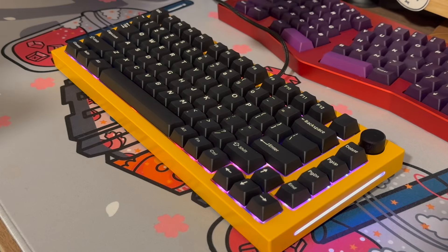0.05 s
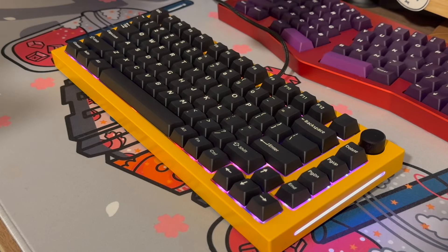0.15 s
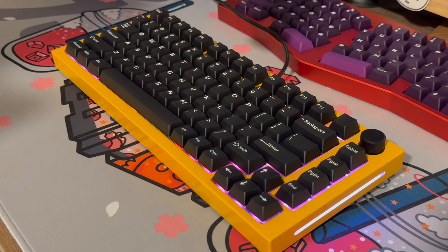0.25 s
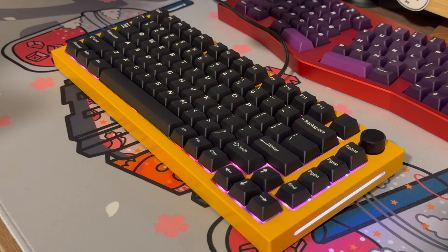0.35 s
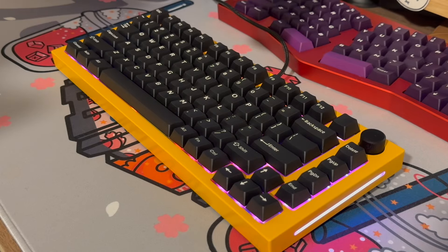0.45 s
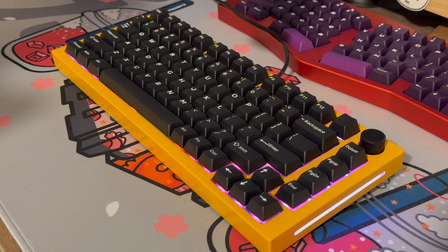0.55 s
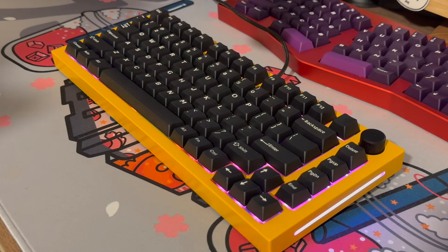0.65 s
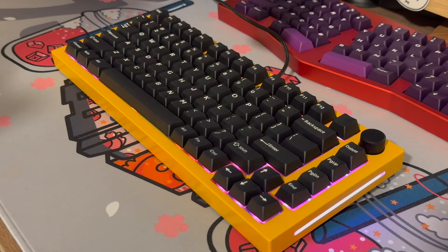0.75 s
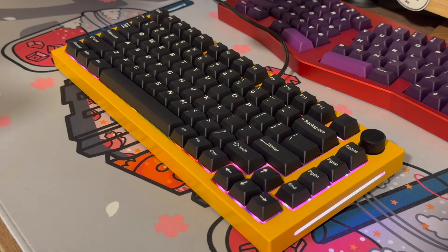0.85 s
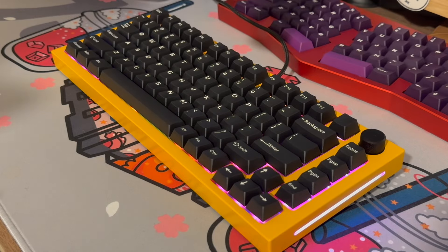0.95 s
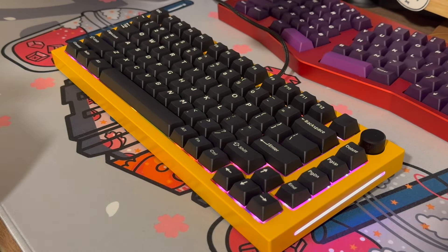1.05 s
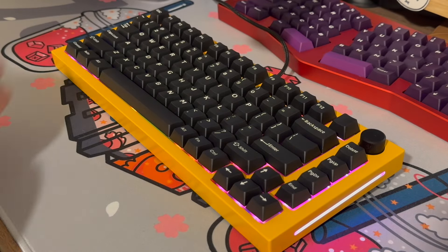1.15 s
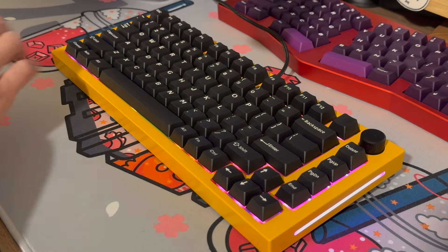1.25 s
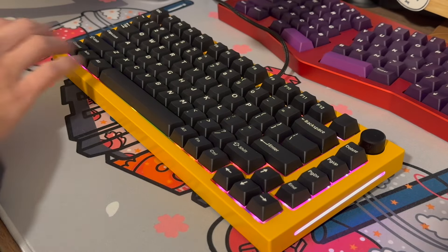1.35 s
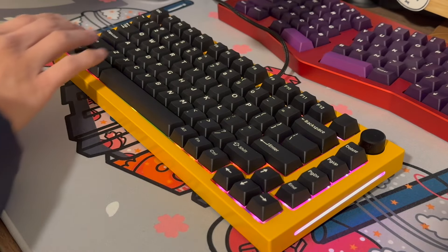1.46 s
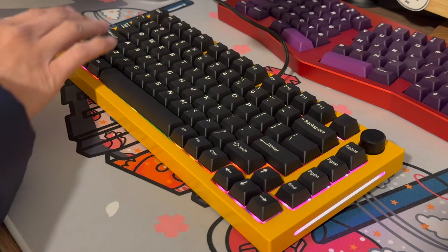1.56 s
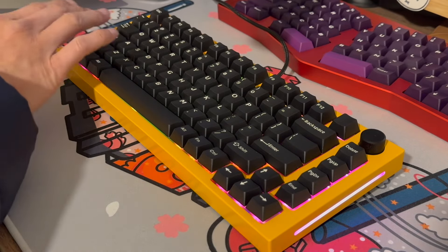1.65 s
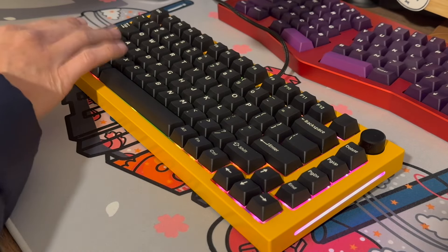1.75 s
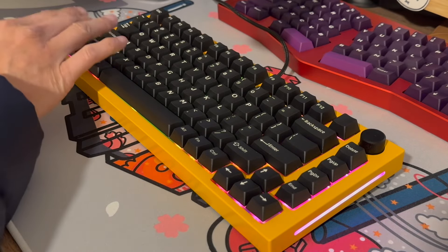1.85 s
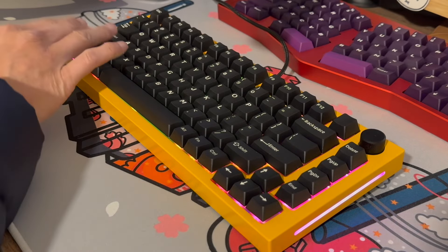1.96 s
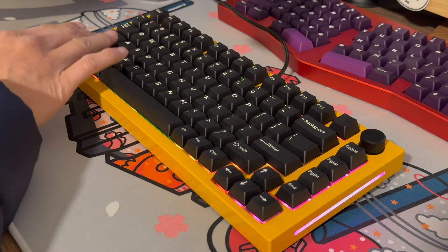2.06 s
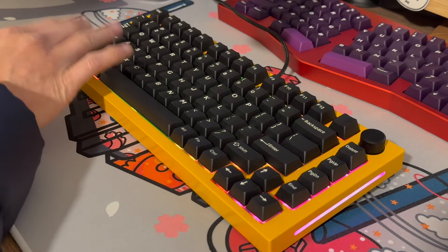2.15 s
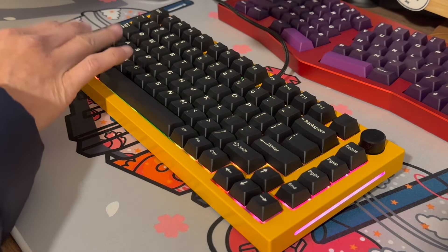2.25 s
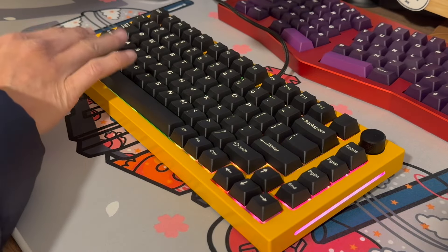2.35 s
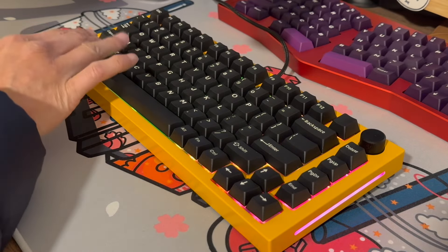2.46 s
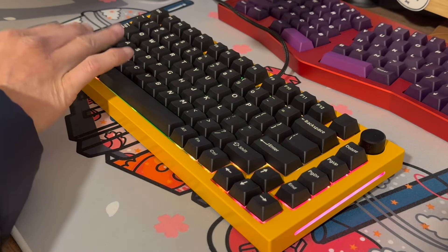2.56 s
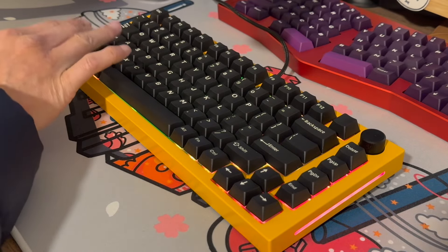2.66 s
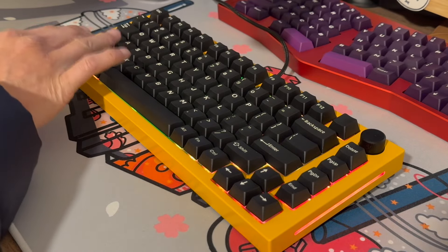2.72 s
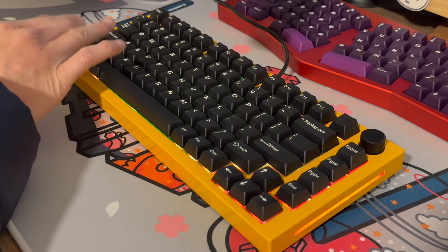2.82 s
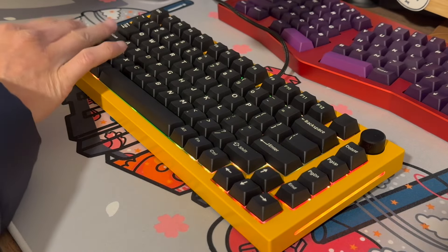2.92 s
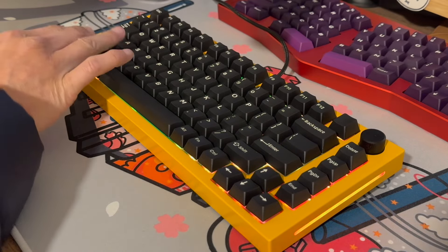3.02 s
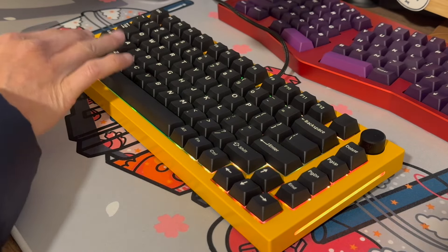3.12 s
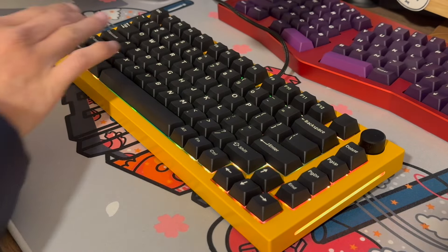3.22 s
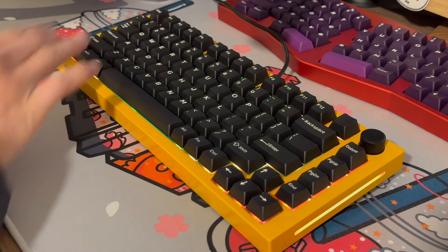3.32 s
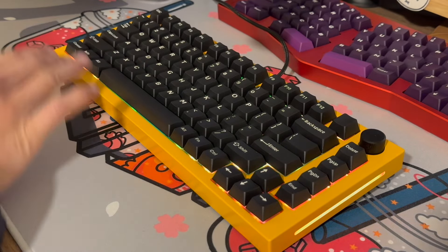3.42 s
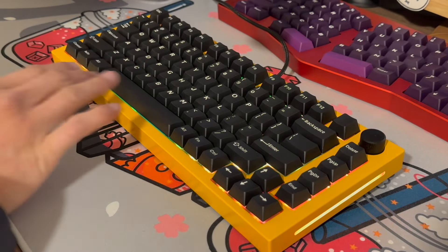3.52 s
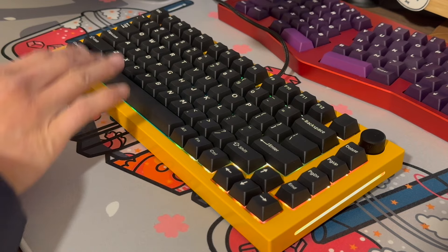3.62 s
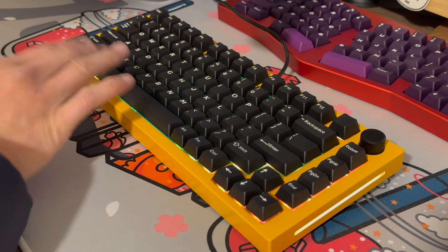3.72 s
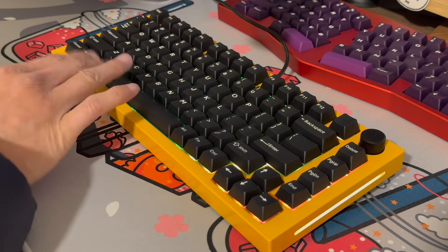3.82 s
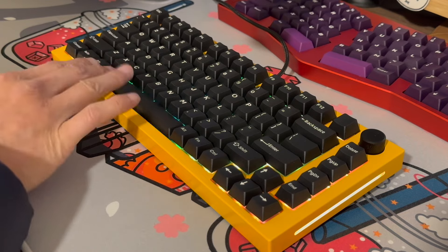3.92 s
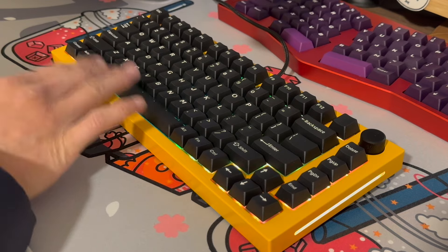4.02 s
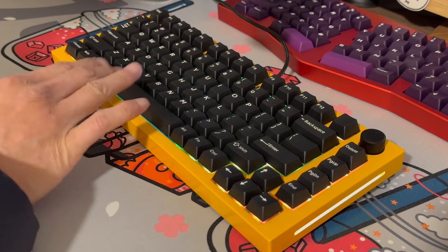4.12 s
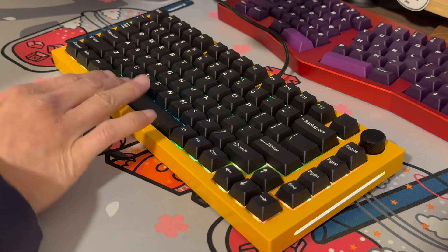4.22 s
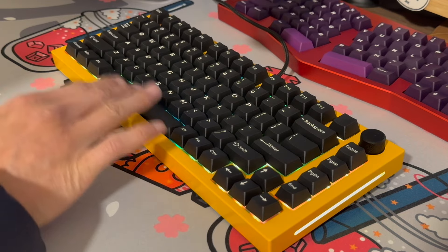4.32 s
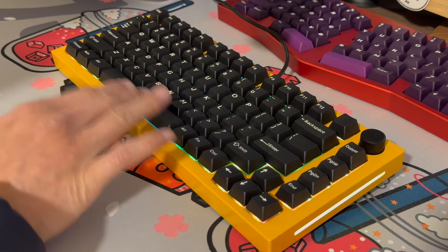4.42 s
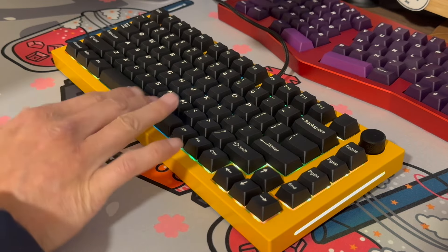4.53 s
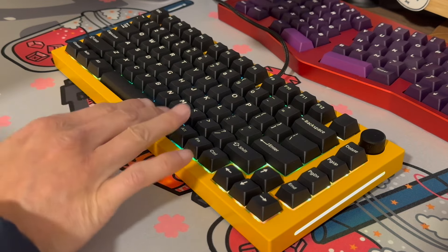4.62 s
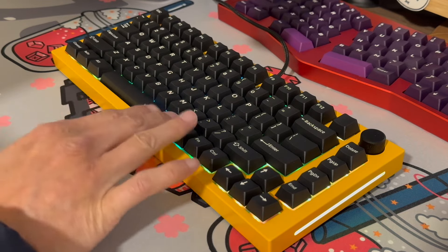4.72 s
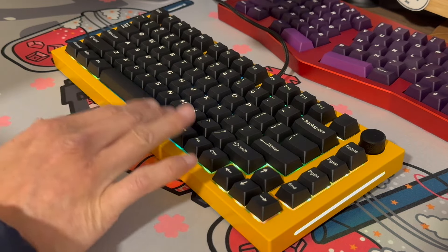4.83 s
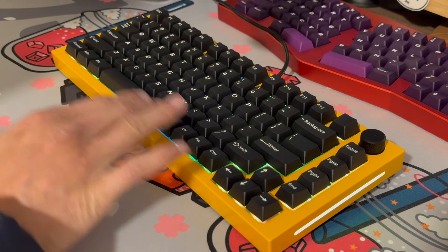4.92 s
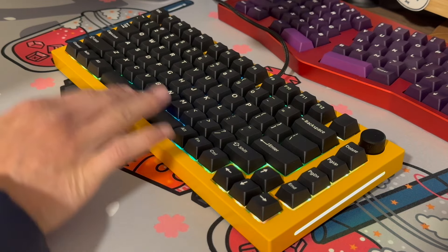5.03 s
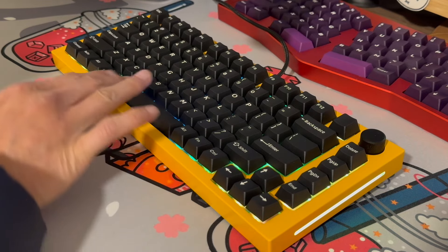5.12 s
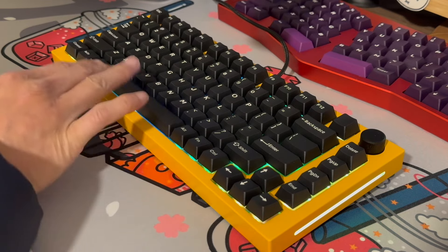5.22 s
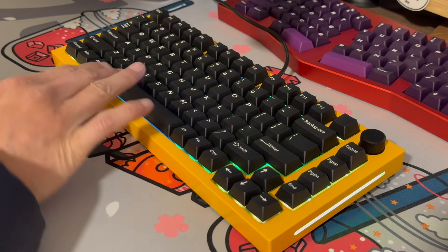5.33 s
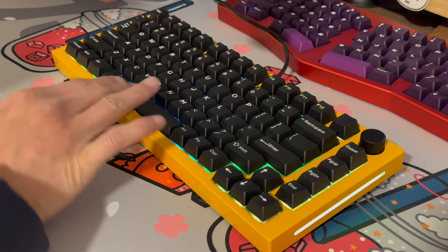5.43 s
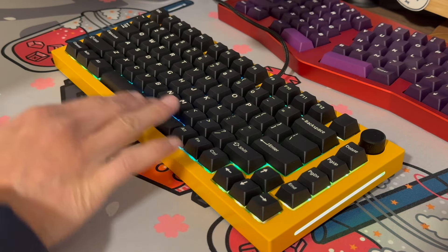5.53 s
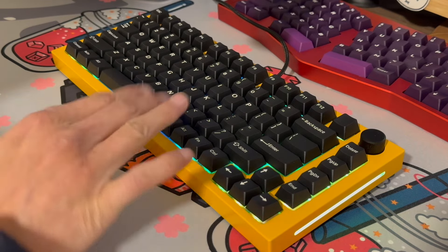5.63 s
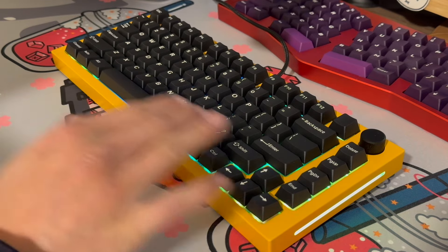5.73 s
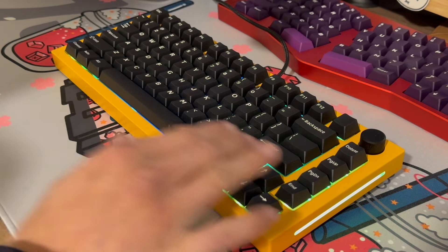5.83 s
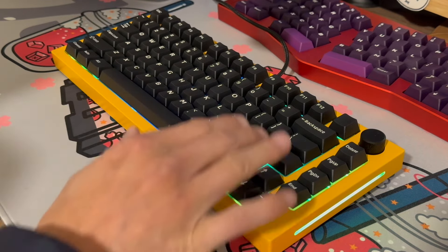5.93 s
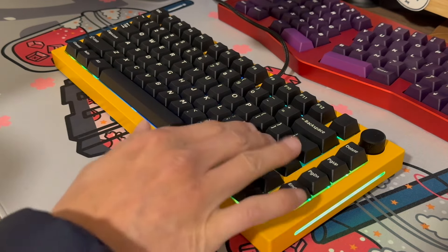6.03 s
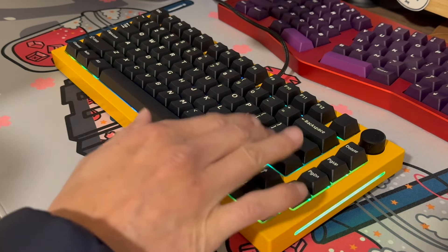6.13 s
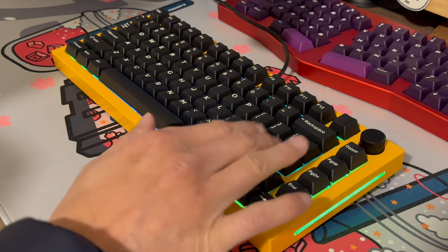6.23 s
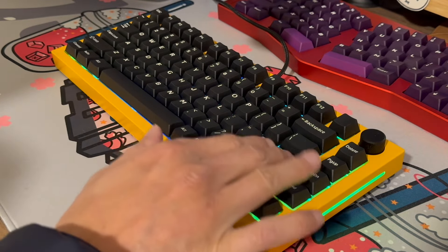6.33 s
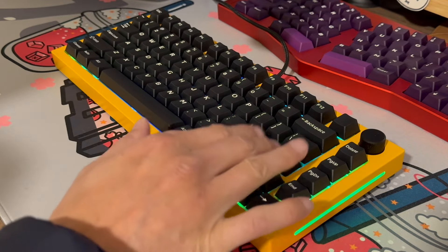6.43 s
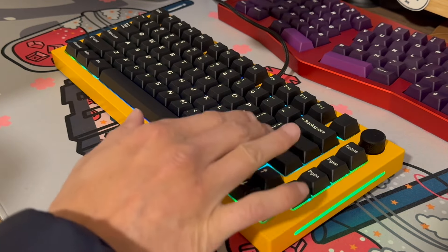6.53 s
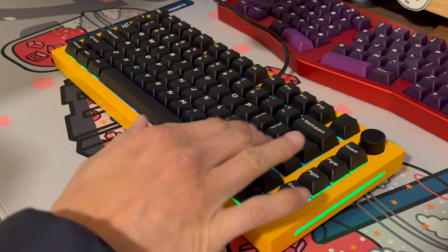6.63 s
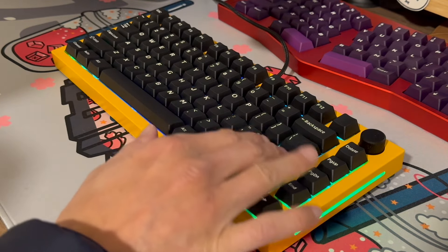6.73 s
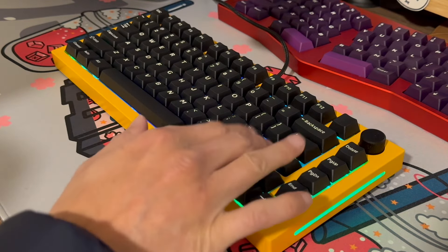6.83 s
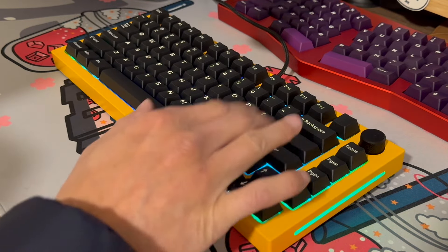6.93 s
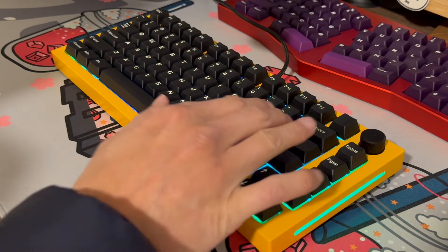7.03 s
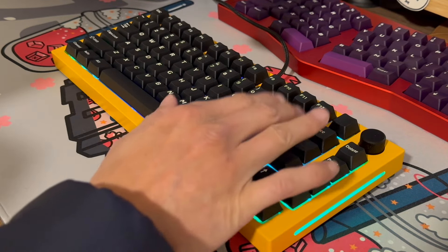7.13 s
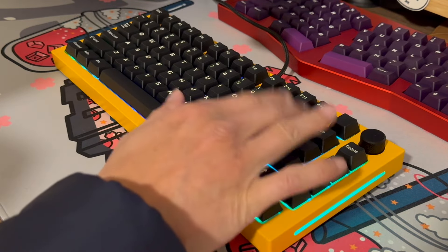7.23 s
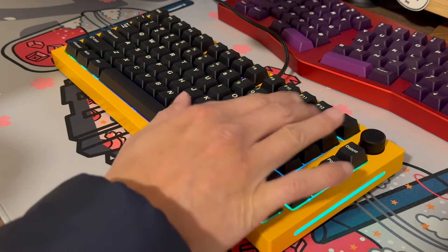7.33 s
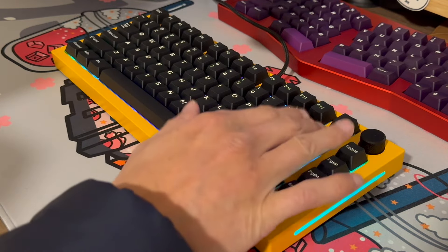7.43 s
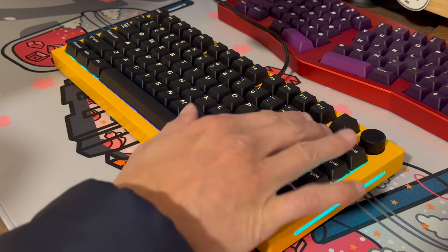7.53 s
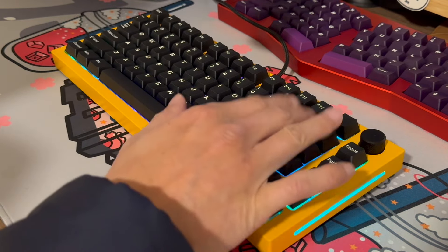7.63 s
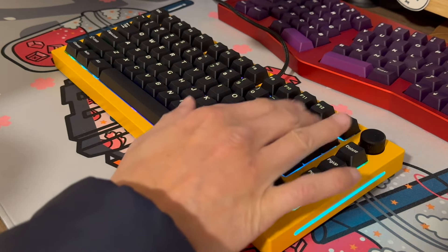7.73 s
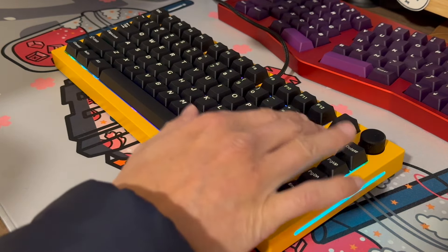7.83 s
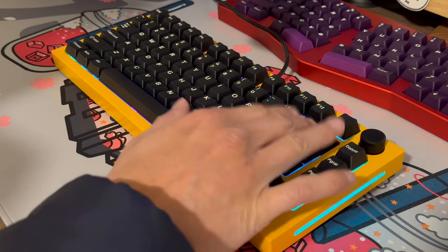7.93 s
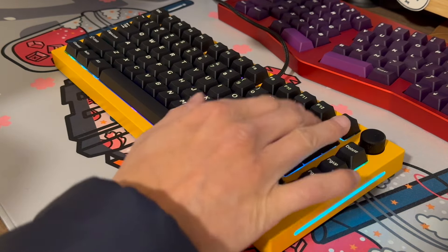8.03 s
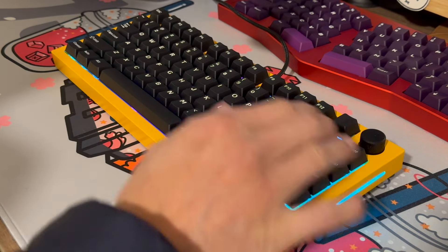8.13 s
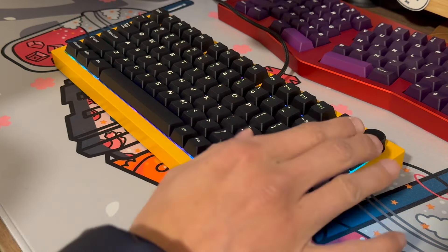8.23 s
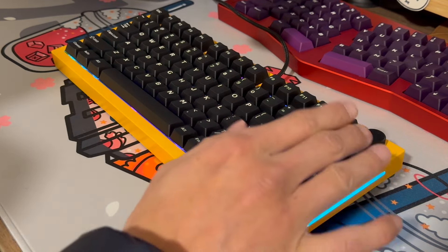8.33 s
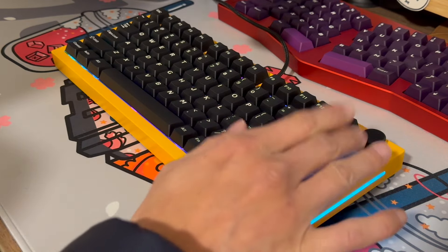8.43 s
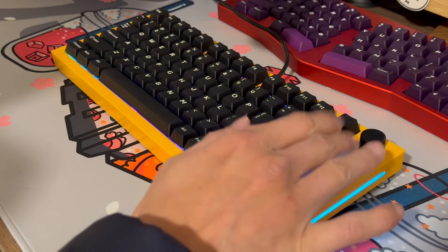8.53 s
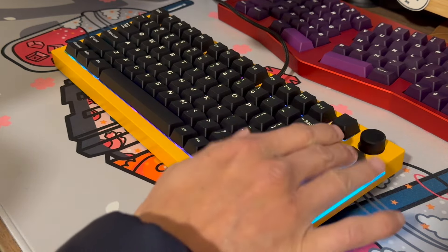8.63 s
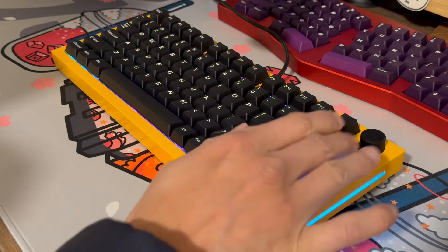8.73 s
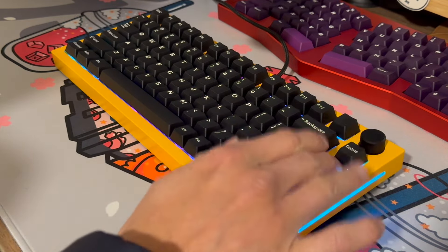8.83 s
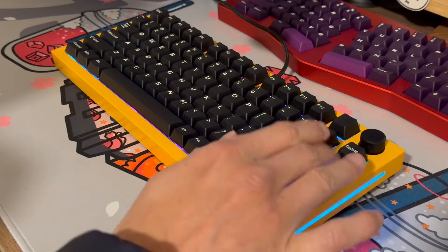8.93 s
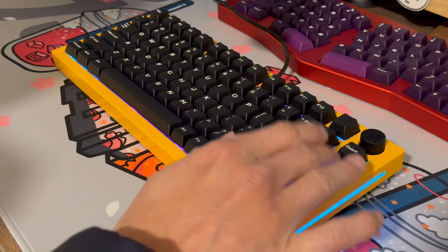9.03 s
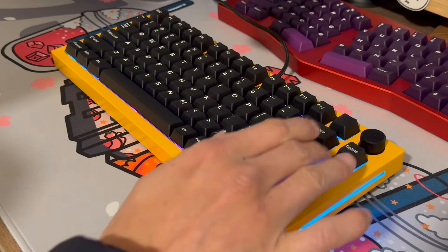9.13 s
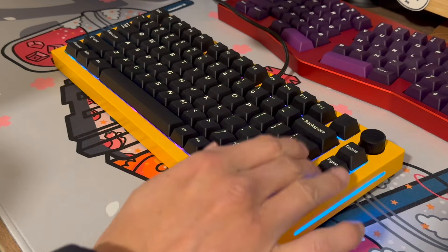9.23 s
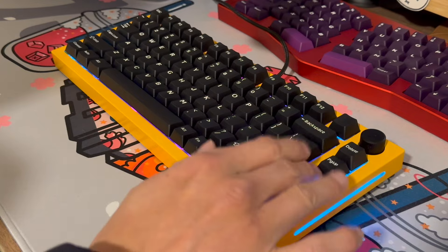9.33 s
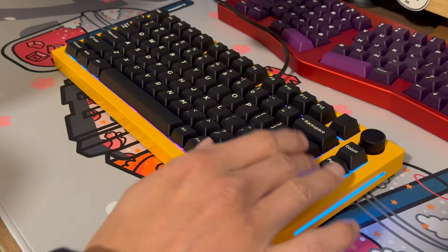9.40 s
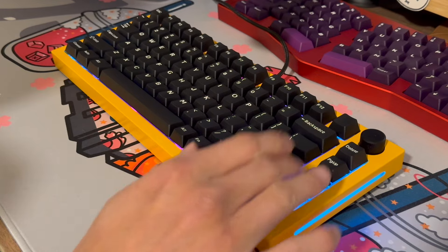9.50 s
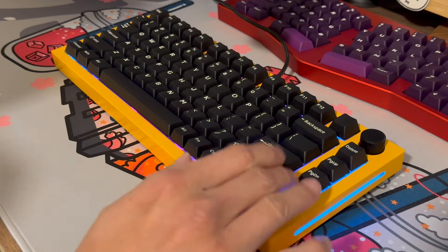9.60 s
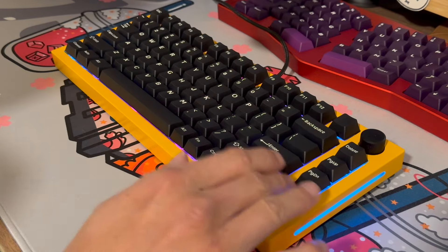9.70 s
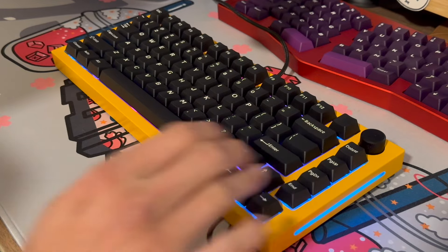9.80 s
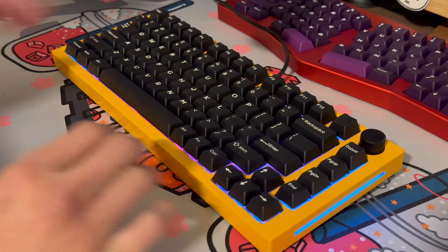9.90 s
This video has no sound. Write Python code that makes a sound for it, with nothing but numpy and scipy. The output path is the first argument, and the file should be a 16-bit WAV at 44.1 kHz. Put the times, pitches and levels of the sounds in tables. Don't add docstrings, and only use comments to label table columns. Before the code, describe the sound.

Steady repeated presses on six different keyboard keys, each with its own tone, deep thock going down and lighter click coming up.

```python
import sys
import numpy as np
from scipy import signal
from scipy.fft import rfft, irfft, next_fast_len
from scipy.io import wavfile
from scipy.ndimage import uniform_filter1d, map_coordinates

SR = 44100
rng = np.random.default_rng(int(sys.argv[2]) if len(sys.argv) > 2 else 0)


def to_wav(sig):
    pcm = np.clip(np.atleast_2d(sig), -1, 1) * 32767
    pcm = np.round(pcm).astype(np.int16)
    wavfile.write(sys.argv[1], SR, pcm.T)


def volts_from_decibels(level):
    exponent = np.asarray(level, float) / 20
    return 10 ** exponent


N = 439236
SIZE = 4096
LEAD_S = 0.013

# f/Hz, level/dB per Hz
AIR = [(30, -5), (70, -22.5), (105, -19), (200, -25.5), (500, -25.5), (1000, -32.5), (2200, -39.5),
       (6000, -39), (13600, -39), (14600, -63.5), (17000, -96.5)]
# t/s, level/dB
DESK_SWAY = [(0, -65), (.97, -69), (1.72, -74), (1.94, -54.5), (3.63, -85.5), (3.99, -49.5), (5.66, -68.5),
             (7.88, -52), (8.16, -65), (8.7, -54), (9.1, -57.5), (9.49, -52), (9.96, -65)]
# f/Hz, width/Hz
DESK_MODES = [(36, 4.4), (71, 4.03), (108, 3.8), (135, 20)]
# t/s, level/dB
SLEEVE_LEVEL = [(0, -86), (.5, -77.5), (1.02, -68.5), (1.3, -72), (3.2, -75.5), (3.75, -79.5), (5.7, -73.5),
                (6.95, -76), (7.07, -69), (7.2, -76), (8.1, -72), (8.5, -83), (9.5, -73), (9.96, -67.5)]
# f/Hz, level/dB per Hz
CLOTH = [(88, -27.5), (150, 1.5), (515, -4), (954, 1), (1540, -6), (2170, -5), (9000, -19), (11700, -40.5),
         (19800, -120)]
# t/s, length/s, level/dB
SLIDES = [
    (3.75, 1, -73),
    (4.36, .14, -77.5),
    (4.81, 0.074, -70),
    (4.91, 0.13, -61.5),
    (5.05, 0.11, -61),
    (5.28, 0.15, -62),
    (5.42, .13, -59.5),
]
# f/Hz, width/Hz, level/dB
SKIN = [(5450, 260, -1), (4900, 900, -7), (6400, 400, -10), (8500, 760, -12), (10200, 1500, -10),
        (13000, 3000, -23)]
# t/s, length/s, level/dB
SWISHES = [
    (.6, 0.26, -74.5),
    (.85, 0.36, -72.5),
    (1.38, 0.19, -71.5),
    (3.33, 0.11, -68),
    (5.75, 0.23, -73.5),
    (8.02, 0.2, -66.5),
    (9.72, 0.84, -70.5),
]
# f/Hz, level/dB per Hz
BRUSH = [(880, -51), (1500, -6), (1990, -9.5), (3780, -3.5), (4780, -9), (9450, -12.5), (14000, -30)]
# t/s, peak level/dB, f/Hz
FIRM_TOUCHES = [(1.5468, -53, 3530), (1.7275, -40, 1940), (1.8735, -51, 1980), (2.0144, -50, 2240),
                (3.7103, -32.5, 3146), (3.8464, -42, 2760), (4.7835, -39.5, 2870), (4.9305, -40.5, 2670),
                (5.3885, -43, 1610), (5.9655, -33.5, 2580), (6.1034, -38, 1720), (6.1614, -42, 1770),
                (6.2357, -27.5, 3060), (6.3833, -43, 3270), (6.5205, -46, 2630), (6.6393, -33, 2940),
                (6.777, -46, 3100), (7.196, -31, 2370), (7.3285, -36, 2780), (7.458, -35, 1420),
                (7.599, -38.5, 2150), (7.7324, -35, 1720), (7.876, -39, 1850), (8.4085, -29.5, 1400),
                (8.425, -41.5, 4370), (8.4376, -43.5, 4050), (8.5371, -37, 1430), (8.6013, -39, 1890),
                (8.7744, -35, 2340), (8.9049, -43, 2500), (9.1319, -33.5, 2700), (9.2719, -40, 2410),
                (9.2765, -44, 2370), (9.3188, -42, 2280), (9.4787, -48.5, 2970), (9.584, -45, 1980)]
TOUCH_T60_MS = [8.5, 14.5, 6.5, 5.5, 15, 8, 8.5, 7, 13, 13.5, 14, 11, 10, 17.5, 17, 12.5, 14.5, 13.5, 16.5,
                15, 16, 15, 13, 12.5, 8, 9, 21, 13.5, 21, 22, 11, 7, 7, 10, 17.5, 12.5]
# t/s, peak level/dB
SOFT_PADS = [
    (1.517, -54.5),
    (3.549, -56.5),
    (6.823, -49),
    (9.76, -58),
    (9.816, -58),
]
# t/s, peak level/dB, f/Hz
BUMPS = [
    (1.233, -37.5, 179),
    (8.983, -35, 1700),
    (6.458, -37, 1900),
]

# t/s, peak level/dB, brightness/dB
LEFT = [(1.738, -11, -31), (1.81, -23.5, -23), (1.89, -10.5, -28.5), (1.963, -24.5, -23), (2.031, -11, -32),
        (2.097, -25, -22.5), (2.169, -9.5, -31), (2.248, -29, -23.5), (2.314, -12, -33.5),
        (2.381, -26.5, -27), (2.433, -13, -34.5), (2.512, -34, -26.5), (2.567, -15, -40),
        (2.63, -29.5, -24), (2.694, -11.5, -33), (2.776, -28, -24), (2.846, -12.5, -35), (2.918, -28, -25),
        (2.991, -17, -37.5), (3.046, -32, -29.5), (3.084, -11.5, -33), (3.144, -21, -25)]
BAR = [(3.719, -6, -20), (3.79, -15, -19), (3.86, -9.5, -20.5), (3.929, -15.5, -15.5), (3.994, -8.5, -23),
       (4.069, -16.5, -18.5), (4.139, -9.5, -23.5), (4.209, -17.5, -16.5), (4.283, -11, -23),
       (4.348, -16, -25.5), (4.409, -11, -22), (4.48, -19.5, -21), (4.545, -11, -23), (4.616, -23, -25),
       (4.659, -11.5, -22), (4.738, -19, -20), (4.8, -8.5, -21), (4.876, -17, -20.5), (4.947, -8, -21.5),
       (5.022, -23, -15.5), (5.088, -11.5, -24), (5.152, -20.5, -20.5), (5.209, -12.5, -21.5),
       (5.273, -21, -16.5), (5.33, -11.5, -24), (5.403, -19, -23), (5.455, -11.5, -24.5),
       (5.543, -16, -22.5)]
MIDDLE = [(5.974, -10.5, -16), (6.044, -19.5, -16), (6.115, -15, -28), (6.175, -17.5, -20.5),
          (6.248, -12.5, -19), (6.319, -25, -36), (6.399, -16, -30.5), (6.454, -15, -36),
          (6.532, -14.5, -27), (6.597, -28.5, -24.5), (6.651, -14, -22), (6.714, -16.5, -20.5),
          (6.789, -15.5, -25.5), (6.859, -19, -15.5)]
WIDE = [(7.204, -10.5, -30), (7.264, -22, -24.5), (7.338, -12, -36.5), (7.406, -27, -26.5),
        (7.469, -12, -32), (7.536, -20, -25.5), (7.611, -13, -35), (7.679, -25, -27.5), (7.744, -12, -33),
        (7.813, -22.5, -22.5), (7.887, -12, -34), (7.971, -26.5, -20)]
CORNER = [
    (8.413, -7.5, -24),
    (8.472, -19.5, -46),
    (8.544, -12.5, -31),
    (8.616, -21, -43),
]
RIGHT = [(8.785, -10.5, -25.5), (8.851, -16.5, -29), (8.915, -12.5, -27), (8.98, -16, -26), (9.14, -9, -21),
         (9.203, -18, -20), (9.283, -10.5, -22), (9.339, -19.5, -33), (9.488, -9.5, -21),
         (9.546, -22, -31.5), (9.603, -13, -22), (9.667, -20, -30)]
# f/Hz, level/dB
LEFT_DOWN = [(410, -28.5), (520, -1), (650, -27.5), (690, 9), (800, -15), (1380, 2), (1420, 4), (1660, 2),
             (1790, 0.5), (2050, 5), (2710, 0), (3620, -9.5), (9540, -32), (15480, -66)]
LEFT_UP = [(410, -30.5), (470, -18.5), (1290, -11.5), (1340, -4.5), (1890, -7.5), (2110, 1.5),
           (2990, -16.5), (3510, -14), (5230, -8.5), (5430, -7), (8380, -31.5), (10080, -30), (14430, -53),
           (15480, -67)]
BAR_DOWN = [(410, -3.5), (1210, -3.5), (1400, -2), (1420, -39), (1490, -19.5), (1610, 9), (1680, -0.5),
            (2020, 8), (2390, 2.5), (2780, 7), (3660, 1), (3980, 1.5), (12940, -36.5), (15480, -70)]
BAR_UP = [(410, -21), (580, -9.5), (780, -22), (840, -9.5), (1400, -10.5), (1780, -0.5), (2300, -9.5),
          (3730, -14), (4180, -21), (5430, -22), (6590, -28.5), (10160, -27.5), (11200, -32.5),
          (15480, -58.5)]
MIDDLE_DOWN = [(410, -33), (620, -13), (1940, -2), (2170, -3), (2610, -26), (2840, -6.5), (3040, -14),
               (3210, -3), (3340, -6.5), (3900, -21.5), (5100, -17), (6630, -23), (6800, -30), (15480, -57)]
MIDDLE_UP = [(410, -23.5), (800, -11), (1250, -9), (1600, -7), (1900, 4.5), (2300, -12), (3100, -6),
             (4000, -21), (6000, -21), (10500, -32), (15480, -71)]
WIDE_DOWN = [(410, -38.5), (520, -31.5), (540, -49), (650, -12.5), (730, -10.5), (1010, -9), (2050, -0.5),
             (3100, -5), (6310, -21), (6960, -12.5), (8850, -31), (9880, -23.5), (12620, -49.5),
             (15480, -53)]
WIDE_UP = [(410, -23.5), (1060, 3), (1100, -3), (1790, 5.5), (1920, 4.5), (2300, 3), (2390, -11),
           (2430, -10), (2800, 0), (3100, -7), (3170, -11), (3400, 3), (12880, -33), (15480, -49.5)]
CORNER_DOWN = [(240, -65), (400, -50), (1200, -3.5), (2150, -7.5), (2790, 2), (3460, -13.5), (4490, -6.5),
               (5730, -22), (6280, -17), (11400, -32.5), (15500, -57)]
CORNER_UP = [(240, -57), (400, -28.5), (1360, -0.5), (2290, 4.5), (3680, -16.5), (4420, -12), (5480, -25),
             (9210, -26), (15500, -59.5)]
RIGHT_DOWN = [(410, -23.5), (620, -24), (690, -27), (1270, -3), (1530, -6.5), (2130, 4), (2450, -4.5),
              (2710, -1), (2970, 2), (5470, -18), (5560, -17.5), (11650, -30), (12250, -40.5),
              (15480, -56.5)]
RIGHT_UP = [(410, -19.5), (670, -17.5), (1270, 2.5), (1570, 1), (1660, 4.5), (1810, -3.5), (2020, 7),
            (2170, 7), (2800, -1.5), (5770, -23), (9260, -25), (12170, -39), (15250, -62), (15480, -83)]
BAR_LIFTS_HZ = [1830, 1790, 1707, 1880, 1720, 1940, 1550, 2000, 2020, 1766, 1540, 1560, 1770, 1690]
MIDDLE_LIFTS_HZ = [1750, 1980, 1850, 1870, 1910, 1870, 1840]
WIDE_LIFTS_HZ = [1700, 1900, 1940, 1790, 2200, 1870]
RIGHT_LIFTS_HZ = [2190, 2170, 2200, 2100, 2030, 2200]
# t/s, peak level/dB
LANDINGS = [(1.814, -36.5), (2.101, -46), (3.1449, -31), (3.796, -26.5), (3.8, -33), (3.9352, -37.5),
            (3.939, -33.5), (4.074, -26), (4.215, -25), (4.2178, -36), (4.3507, -27), (4.4841, -30.5),
            (4.6185, -32), (4.741, -30.5), (4.8779, -24.5), (5.0222, -35.5), (5.0261, -28.5), (5.1544, -26),
            (5.2757, -29.5), (5.407, -28.5), (6.0464, -31), (6.1759, -21.5), (6.7162, -27), (5.5454, -35.5),
            (6.3201, -21), (6.4551, -15), (6.5991, -25.5), (6.8632, -29.5), (7.2653, -21), (7.4037, -23.5),
            (7.5385, -37), (7.542, -54), (7.6803, -23.5), (7.683, -35), (7.8159, -31), (7.9741, -40),
            (8.478, -35), (8.62, -27.5), (8.8545, -26), (8.9828, -25), (9.2053, -21), (9.3405, -24),
            (9.671, -37)]
WIRES = {"left": (5902, 453, -20, -13), "bar": (5442.5, 116.5, -4, -25), "middle": (6301, 198.5, -15, -33),
         "wide": (5195, 398.5, -35, -11), "corner": (4500, 200, -28, -28), "right": (4500, 199, -23, -25)}
CASE = {"left": [(121.4, 54, -42, -48), (219, 180, -45, -41.5), (270, 64, -47, -48), (485, 56, -40, -39.5),
        (716, 100, -26.5, -39.5)], "bar": [(133, 50, -36, -44.5), (270, 53, -30.5, -30.5),
        (493, 85, -36, -23.5), (708, 140, -31.5, -33.5)], "middle": [(135, 93, -35, -43),
        (249, 83, -41.5, -41.5), (476, 60, -34.5, -43.5), (732, 140, -44, -25.5)],
        "wide": [(146, 68, -34.5, -35.5), (236, 61, -40, -31), (440, 30, -45.5, -38.5),
        (702, 170, -30.5, -39)], "corner": [(123, 34, -40.5, -43), (480, 120, -51, -40),
        (700, 150, -60, -37)], "right": [(130, 49, -41.5, -48), (377, 62, -54, -66),
        (665, 72, -38.5, -30.5)]}
PLATE = {"left": (2500, 760, -13), "bar": (2000, 380, -2), "middle": (2500, 500, 0.89),
         "wide": (2230, 200, 3), "corner": (2900, 550, -13), "right": (2280, 120, 1.8)}
SHEEN = {"left": (5900, 1300, 5.6), "bar": (5360, 1500, 3), "middle": (6200, 720, 4.7),
         "wide": (4400, 1300, 1.4), "corner": (4200, 980, 0.1), "right": (4640, 810, 0.1)}
ROOM_SHARE_DB = [-0.5, -3.5, -2, -2, 0, -1]

# t/s, level/dB
FLUTTER = [(.012, -27.5), (.014, -28), (0.0208, -43), (.024, -35), (.0325, -36), (.0355, -41.5),
           (.046, -47.5)]
# f/Hz, time to fall 60 dB/s
ROOM_T60 = [(150, 0.28), (2000, 0.31), (5000, 0.23), (12000, 0.012)]
# f/Hz, level/dB
WALLS = [(250, 1), (450, 5.5), (800, -2.5), (1500, -3), (2200, -8), (2900, -3.5), (3800, -3), (5600, -1.5),
         (7500, 1), (12000, -2.5)]
MOVES_S = [
    0,
    3.5,
    5.8,
    7.1,
    8.2,
    8.7,
    9.05,
    9.4,
    10,
]


def along(points, hz):
    f, value = np.transpose(points)
    return np.interp(np.log(hz + 1), np.log(f + 1), value)


def over_time(points):
    s, value = np.transpose(points)
    return np.interp(np.arange(N) / SR, s, value)


def mode(f, hz, width):
    return 1j * f * width / (hz * hz - f * f + 1j * f * width)


def noise(response):
    length = next_fast_len(N)
    spectrum = rfft(rng.standard_normal(length)) * response(np.fft.rfftfreq(length, 1 / SR))
    x = irfft(spectrum, length)[:N]
    return x / np.std(x)


def add(track, s, sound):
    part = track[round(s * SR):][:len(sound)]
    part += sound[:len(part)]


def swells(rows, power):
    level = np.zeros(N)
    for s, length, db in rows:
        add(level, s, volts_from_decibels(db) * np.hanning(round(length * SR)) ** power)
    return level


def causal(db):
    cepstrum = irfft(db * np.log(10) / 20)
    cepstrum[1:SIZE // 2] *= 2
    cepstrum[SIZE // 2 + 1:] = 0
    return np.exp(rfft(cepstrum))


def room_air():
    return volts_from_decibels(-69.5) * noise(lambda f: volts_from_decibels(along(AIR, f)))


def desk():
    sway = volts_from_decibels(over_time(DESK_SWAY)) * noise(lambda f: mode(f, 32.5, 11.9) ** 3)
    fan = volts_from_decibels(-86.0) * noise(lambda f: mode(f, 140, 4.6) ** 2)
    fan += volts_from_decibels(-87.0) * noise(lambda f: mode(f, 120, 6.9) ** 2)
    return sway + fan


def skin_colour(f):
    notes = sum(volts_from_decibels(db) * abs(mode(f, hz, width)) ** 2 for hz, width, db in SKIN)
    return notes / (1 + (f / 14300) ** 20)


def rustle():
    slips_db = 1.0 * map_coordinates(rng.standard_normal(900), [np.linspace(0, 899, N)])
    work = [(taps[0][0] + 0.048, taps[-1][0] - taps[0][0], -69.5) for taps in (LEFT, BAR, MIDDLE, WIDE)]
    cloth_level = np.hypot(volts_from_decibels(over_time(SLEEVE_LEVEL)), swells(work, 0.057))
    cloth = cloth_level * noise(lambda f: volts_from_decibels(along(CLOTH, f)))
    skin = swells(SLIDES, 0.51) * noise(skin_colour)
    hand = swells(SWISHES, 0.25) * noise(lambda f: volts_from_decibels(along(BRUSH, f)) * (f < 14200))
    return volts_from_decibels(slips_db) * (cloth + skin + hand)


def touches():
    track = np.zeros(N)
    t, f = np.arange(SIZE // 4) / SR, np.fft.rfftfreq(SIZE // 4, 1 / SR)
    contacts = [(*row, ms) for row, ms in zip(FIRM_TOUCHES, TOUCH_T60_MS)]
    for taps, db in zip((LEFT, BAR, MIDDLE, WIDE, RIGHT), (-57, -50, -59, -64, -58)):
        contacts += [(row[0] - LEAD_S, db, 2310, 12) for row in taps[::2]]
    contacts += [(*row, 806, 12) for row in SOFT_PADS]
    for s, db, centre_hz, t60_ms in contacts:
        hz = centre_hz * np.exp(0.05 * rng.standard_normal())
        scrape = rng.standard_normal(len(t)) * t * volts_from_decibels(-60000 * t / t60_ms)
        cap = (mode(f, hz, .6 * hz) + 0.08) / (1 + 1j * f / (2.6 * centre_hz)) ** 4
        tick = irfft(rfft(scrape) * cap)
        add(track, s + (10 - t60_ms) / 7000, volts_from_decibels(db) * tick / abs(tick).max())
    return track + bumps()


def bumps():
    track, t = np.zeros(N), np.arange(SIZE) / SR
    for s, db, hz in BUMPS:
        swell = np.sin(np.pi * t / t[-1]) * volts_from_decibels(-60 * t / 0.06)
        add(track, s, volts_from_decibels(db) * swell * np.sin(2 * np.pi * hz * t))
    return track


def desk_boom(desk_db):
    t = np.arange(SR // 2) / SR
    boom = sum(volts_from_decibels(db) * np.exp(-np.pi * width * t) * np.sin(2 * np.pi * hz * t)
               for db, (hz, width) in zip(desk_db, DESK_MODES))
    return (1 - np.exp(-t / 0.027)) ** 2 * boom


def case_rings(name, f):
    rings = [irfft(mode(f, hz, width) / (1 + 1j * f / (2.2 * hz)) ** 2) for hz, width, *_ in CASE[name]]
    rings[0] = -rings[0]
    return [ring / abs(ring).max() for ring in rings]


def rough_blow(t, f, treble, rattle_db):
    grit = rfft(rng.standard_normal(SIZE) * volts_from_decibels(-60 * t / 0.0077)) / 6
    clumps = volts_from_decibels(4 * np.repeat(rng.standard_normal(SIZE // 40 + 1), 40)[:SIZE])
    loose = rfft(rng.standard_normal(SIZE) * clumps * volts_from_decibels(-60 * t / 0.018))
    rattle = volts_from_decibels(rattle_db) * loose * 1.44 / (1 + 1j * f / 2600)
    return 1 + treble ** 2 * (grit - 1) + rattle


def key(strokes, down, up, name, rattle_db, desk_db, lifts_hz=None):
    direct, spread = np.zeros(N), np.zeros(N)
    t, f = np.arange(SIZE) / SR, np.fft.rfftfreq(SIZE, 1 / SR)
    rows = np.array(strokes)
    boom, rings = desk_boom(desk_db), case_rings(name, f)
    wire_hz, wire_width, *wire_db = WIRES[name]
    treble = np.clip(np.log2(f / 2500 + 1e-9) / 1.81, 0, 1)
    bending = np.exp(-.24j * np.sqrt(f))
    plate = 1
    for hz, width, db in (PLATE[name], SHEEN[name]):
        plate = plate + volts_from_decibels(db) * mode(f, hz, width)
    usual_db = [np.median(rows[side::2, -1]) for side in range(2)]
    notes = np.ones(len(rows))
    if lifts_hz:
        notes[1::2] = np.divide(lifts_hz, np.median(lifts_hz))
    blows = [(*row, k % 2, notes[k], 1) for k, row in enumerate(strokes)]
    blows += [(s, db, usual_db[1], 1, 1, 0) for s, db in LANDINGS
              if rows[0, 0] < s < rows[-1, 0] + LEAD_S]
    for s, db, bright_db, side, note, full in blows:
        body = (down, up)[side]
        shape_db = along(body, f / note ** (1 - treble))
        shape_db += 18 * np.minimum(np.log2((f + 20) / body[0][0]), 0)
        shape_db = uniform_filter1d(shape_db, size=23)
        hard_db = treble * (bright_db - usual_db[side])
        shape_db = shape_db - shape_db.max() + hard_db
        blow = rough_blow(t, f, treble, rattle_db[side] + (-5, -1)[side])
        push, luck = rng.standard_normal(2)
        ping = volts_from_decibels(wire_db[side] + hard_db[-1] + 2 * luck) * mode(f, wire_hz * (1 + .004 * push), wire_width)
        ping = ping / (1 + (f / wire_hz) ** 10)
        clack = irfft(bending * (blow * causal(shape_db) + 1.8 * ping))
        smooth_db = 10 * np.log10(uniform_filter1d(volts_from_decibels(2 * shape_db), size=61) + 1e-12)
        blurred = irfft(plate * blow * causal(smooth_db) + 0.6 * ping)
        thud = sum(volts_from_decibels(row[2 + side] + .7 * rng.standard_normal()) * ring
                   for row, ring in zip(CASE[name], rings))
        peak = abs(clack).max()
        add(direct, s + 0.0009, volts_from_decibels(db) * (clack / peak + thud))
        add(spread, s + 0.0009, volts_from_decibels(db) * (blurred / peak + thud))
        add(direct, s, full * volts_from_decibels(.5 * db + 2 * push - 5 * side) * boom)
    return direct, spread


def keys():
    sounds = np.array([
        key(LEFT, LEFT_DOWN, LEFT_UP, "left", rattle_db=(-30, -22), desk_db=(-39.5, -44.0, -54.5, -69.0)),
        key(BAR, BAR_DOWN, BAR_UP, "bar", rattle_db=(-31, -24), desk_db=(-41.0, -42.5, -54.5, -42),
            lifts_hz=BAR_LIFTS_HZ),
        key(MIDDLE, MIDDLE_DOWN, MIDDLE_UP, "middle", rattle_db=(-29, -22),
            desk_db=(-37.5, -46, -52.5, -69.0), lifts_hz=MIDDLE_LIFTS_HZ),
        key(WIDE, WIDE_DOWN, WIDE_UP, "wide", rattle_db=(-30, -20), desk_db=(-35.5, -49.5, -52.0, -61.0),
            lifts_hz=WIDE_LIFTS_HZ),
        key(CORNER, CORNER_DOWN, CORNER_UP, "corner", rattle_db=(-26, -21),
            desk_db=(-35.0, -47.0, -53.5, -58)),
        key(RIGHT, RIGHT_DOWN, RIGHT_UP, "right", rattle_db=(-28, -21), desk_db=(-45.5, -52.5, -56, -57),
            lifts_hz=RIGHT_LIFTS_HZ)])
    return sounds[:, 0].sum(0), volts_from_decibels(ROOM_SHARE_DB) @ sounds[:, 1]


def room_answer():
    hz, t, grains = signal.stft(rng.standard_normal(SR // 2), SR, nperseg=256)
    fade_db = along(WALLS, hz)[:, None] - 60 * t / along(ROOM_T60, hz)[:, None]
    tail = signal.istft(grains * volts_from_decibels(fade_db), SR, nperseg=256)[1]
    tail = tail * (1 - np.exp(-np.arange(len(tail)) / SR / .015)) ** 2
    tail = volts_from_decibels(-29.0) * np.pad(tail, (200, 0)) / np.linalg.norm(tail)
    band = signal.butter(2, (2400, 6500), "band", fs=SR)
    for s, db in FLUTTER:
        echo = signal.lfilter(*band, rng.standard_normal(45)) * np.hanning(45)
        add(tail, s, volts_from_decibels(db - 6) * echo / np.linalg.norm(echo))
    return tail


def room(x):
    wet = np.zeros(N)
    for start, end in zip(MOVES_S, MOVES_S[1:]):
        taps = x[round(start * SR):round(end * SR)]
        add(wet, start, signal.fftconvolve(taps, room_answer()))
    return wet


def scene():
    direct, spread = keys()
    tips = touches()
    mono = room_air() + desk() + rustle() + room(spread + tips) + tips + direct
    return np.array([mono, mono])


def low_pass(x):
    return signal.sosfilt(signal.butter(12, 16600, fs=SR, output="sos"), x)


def record(dry):
    smear = np.diff(rng.standard_normal(300)) * volts_from_decibels(-52) + rng.standard_normal(299) * volts_from_decibels(-70)
    flicker = np.repeat(rng.standard_normal(N // 1024 + 1), 1024)[:N]
    side = signal.fftconvolve(dry[0], smear)[:N] * volts_from_decibels(5 * flicker + 2) * (flicker > -.4)
    pair = rfft(dry + [side, -side]) * (np.fft.rfftfreq(N, 1 / SR) < 16500)
    return low_pass(irfft(pair, N))


dry = scene()
out = record(dry)
to_wav(out)
```